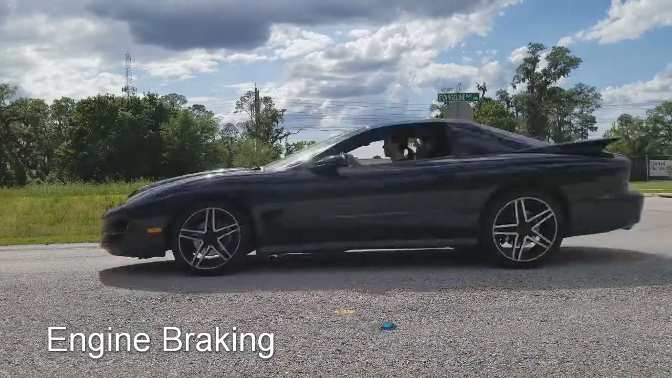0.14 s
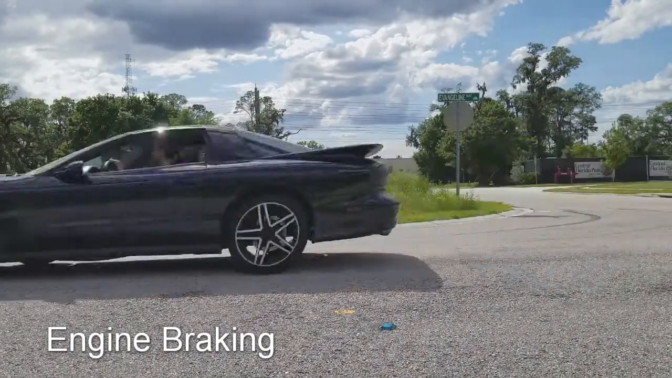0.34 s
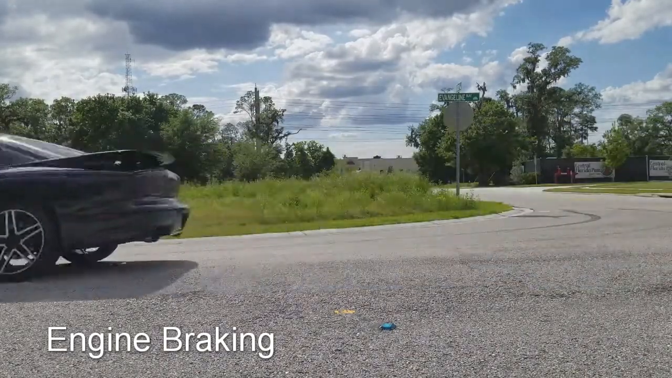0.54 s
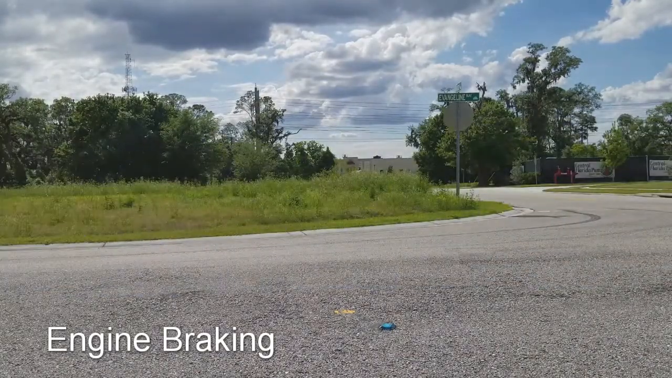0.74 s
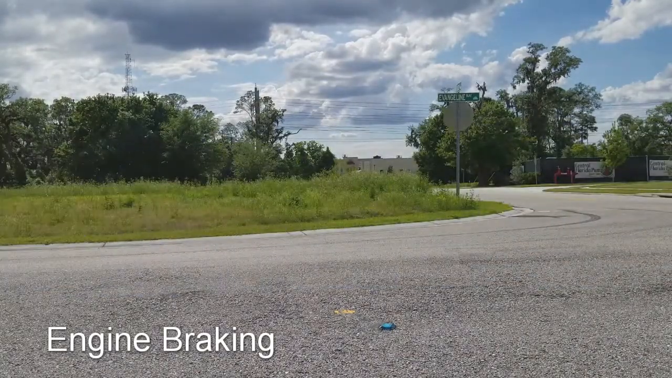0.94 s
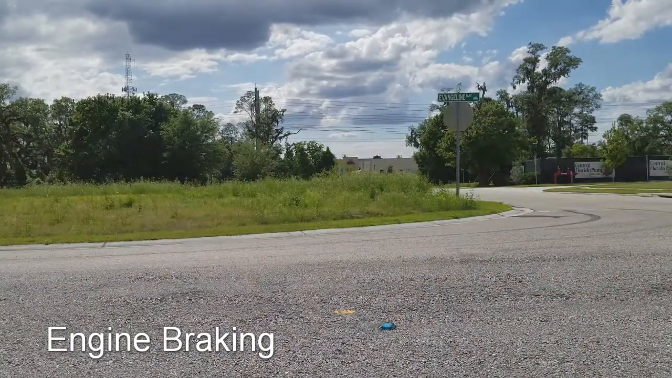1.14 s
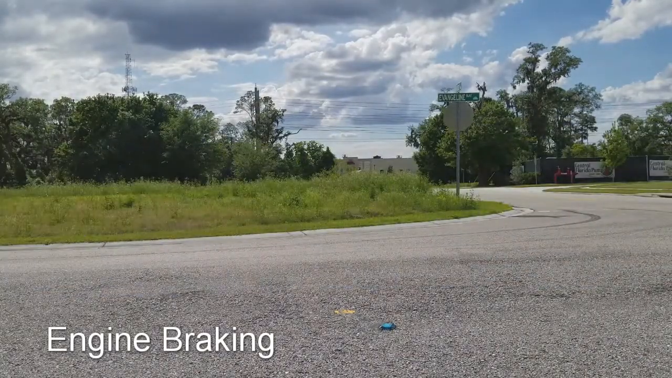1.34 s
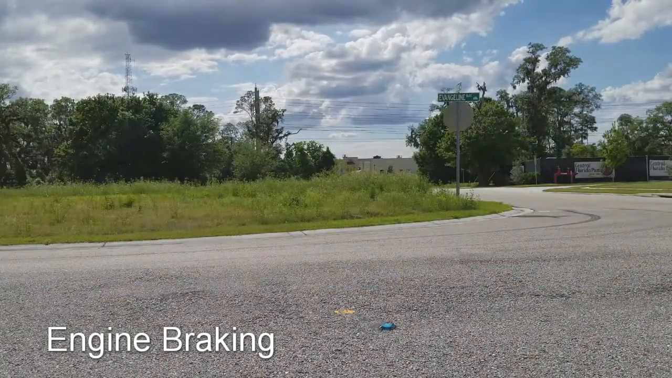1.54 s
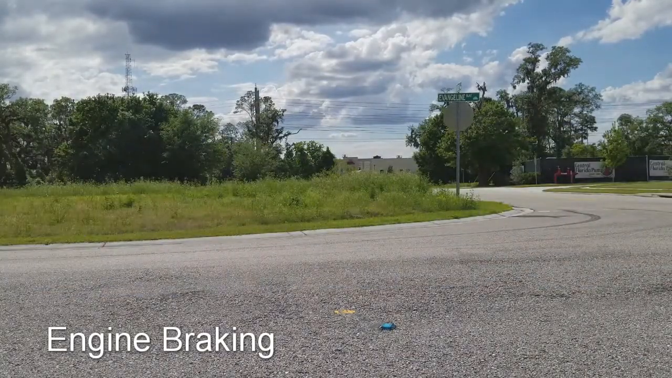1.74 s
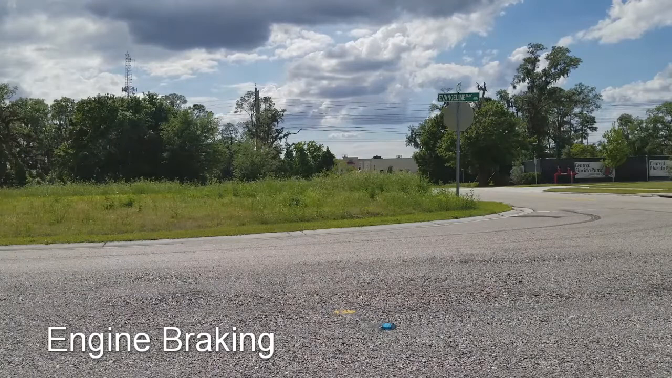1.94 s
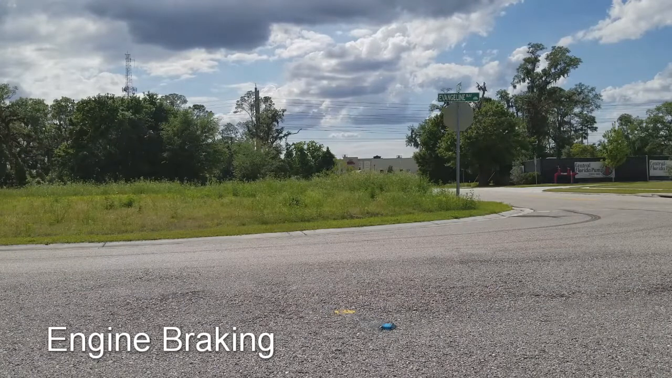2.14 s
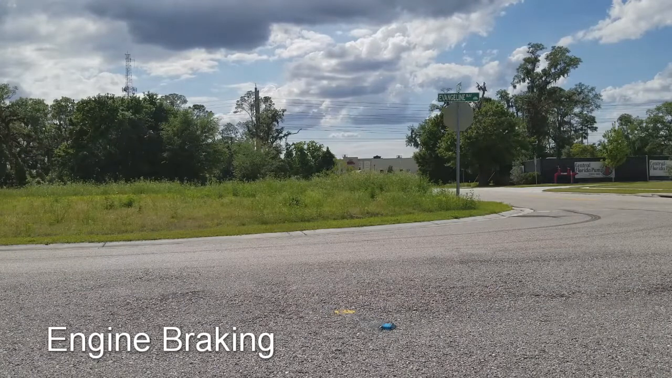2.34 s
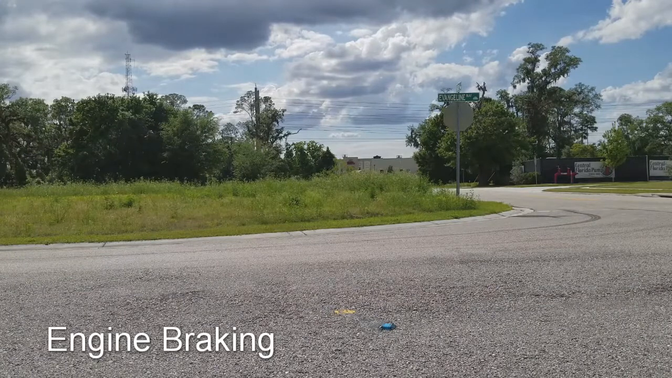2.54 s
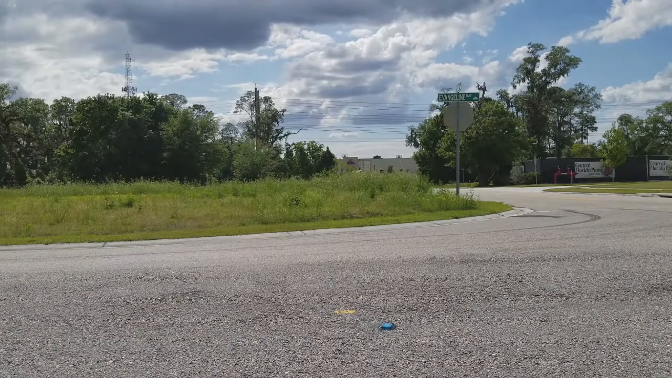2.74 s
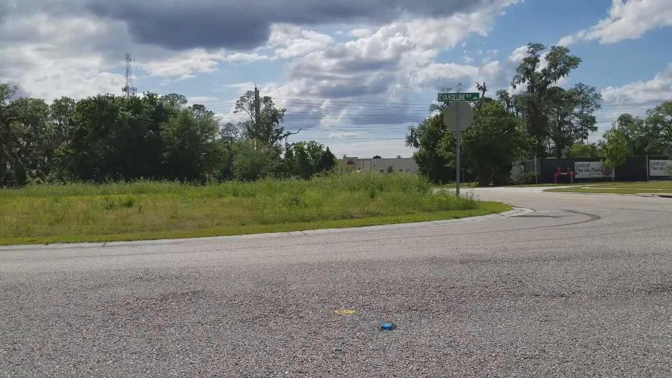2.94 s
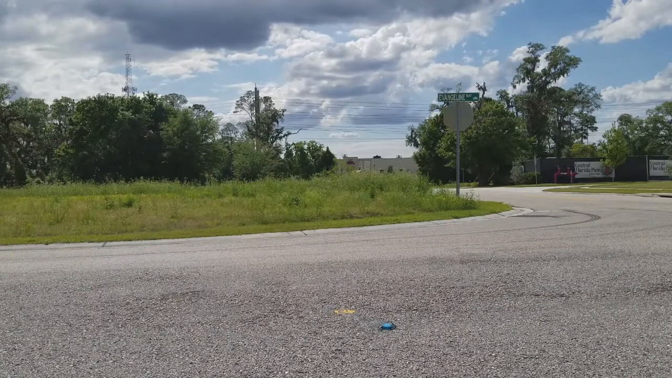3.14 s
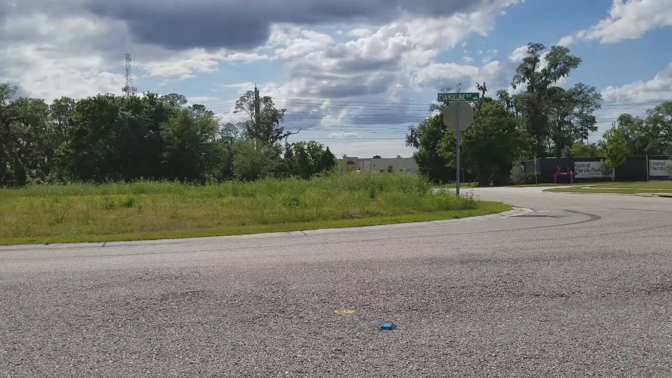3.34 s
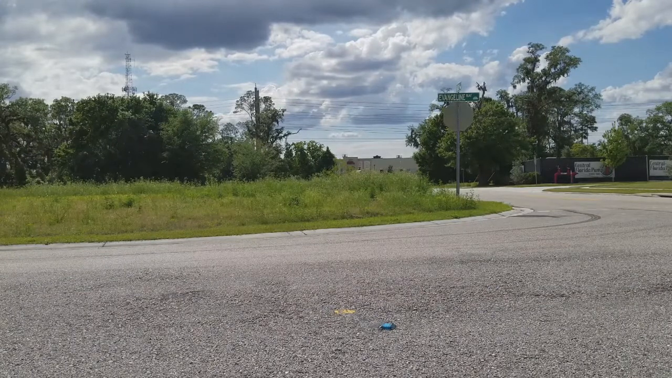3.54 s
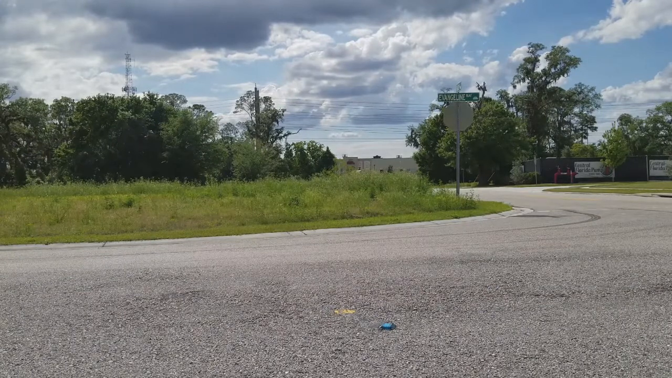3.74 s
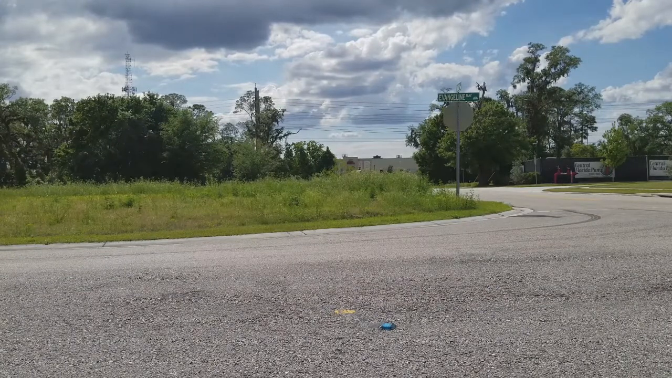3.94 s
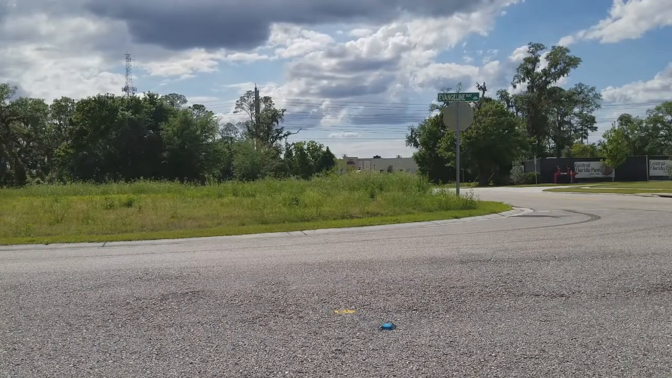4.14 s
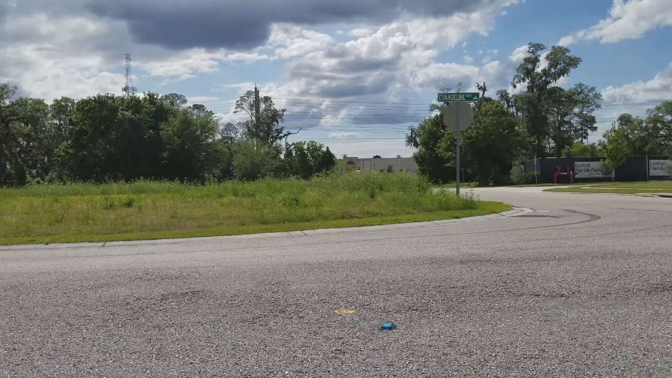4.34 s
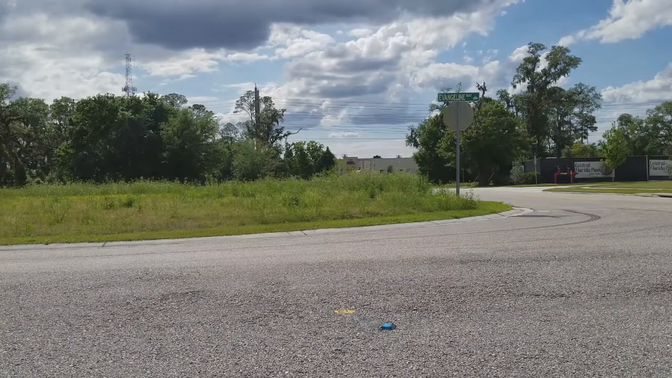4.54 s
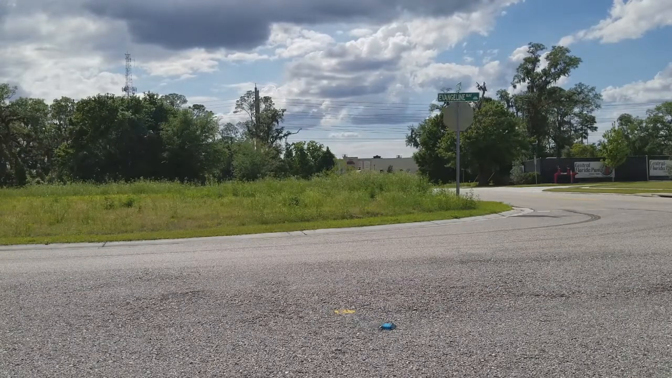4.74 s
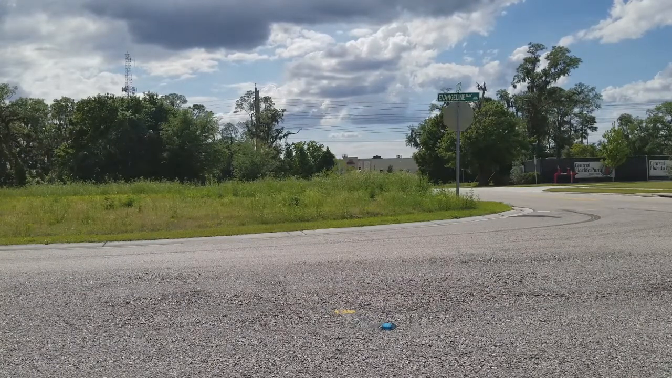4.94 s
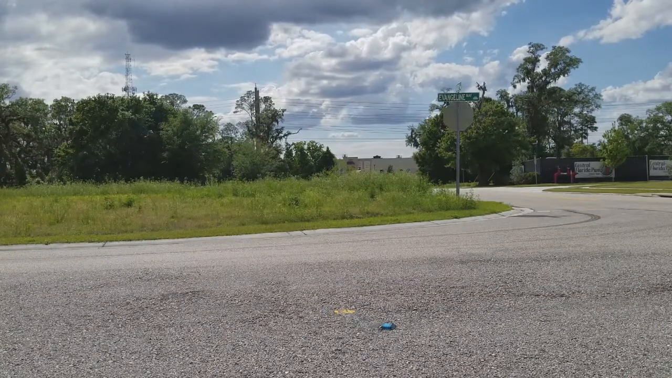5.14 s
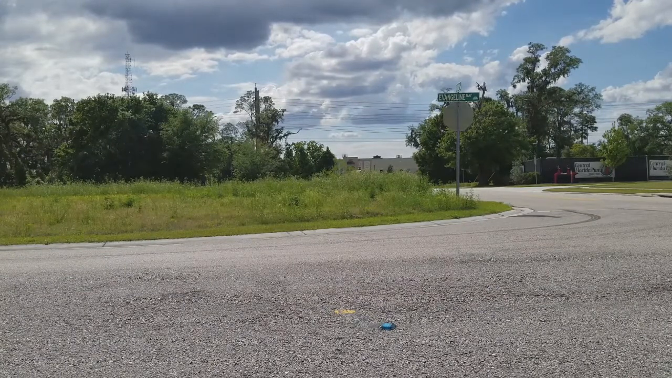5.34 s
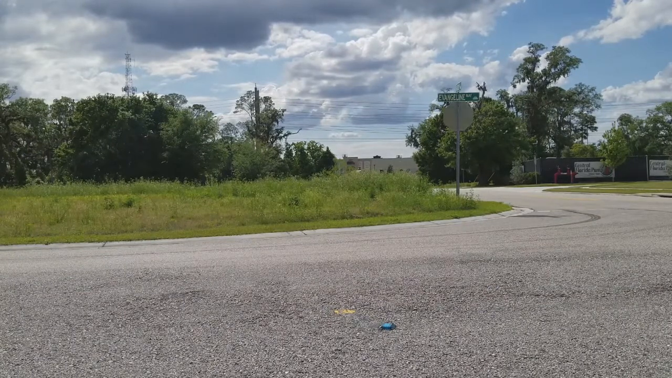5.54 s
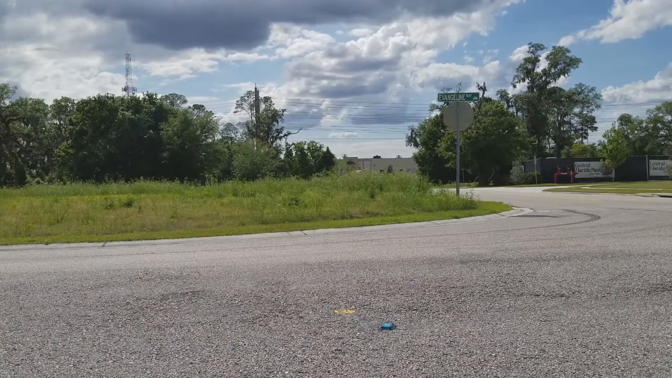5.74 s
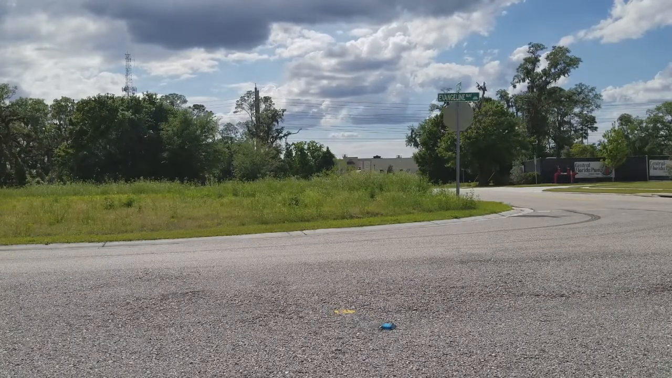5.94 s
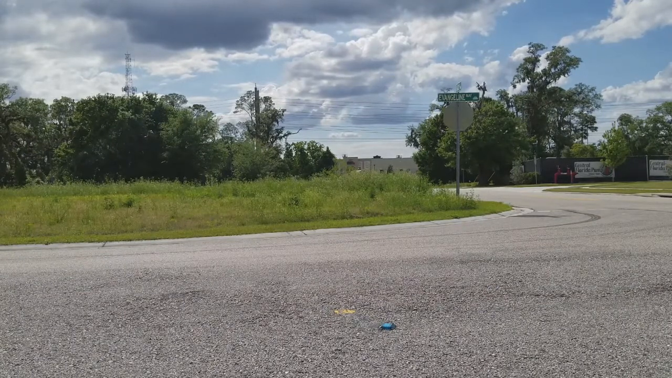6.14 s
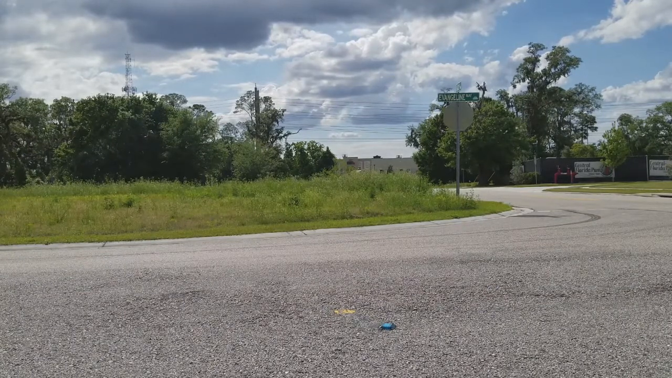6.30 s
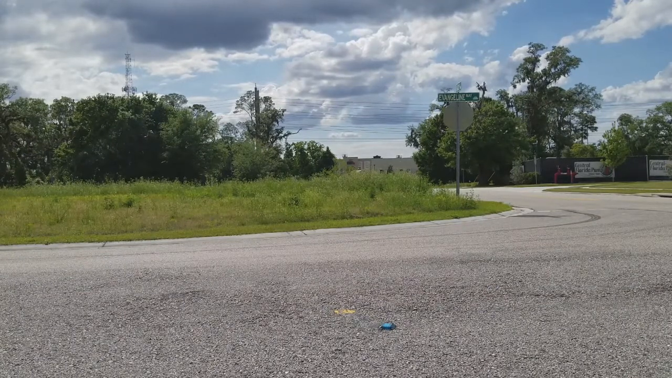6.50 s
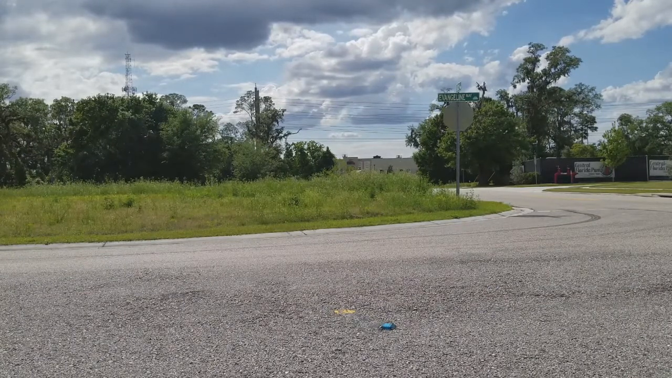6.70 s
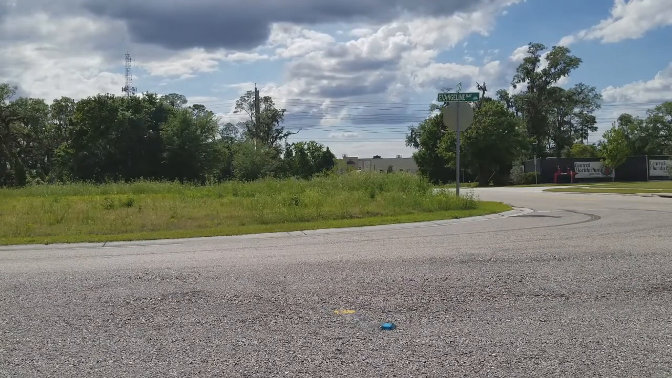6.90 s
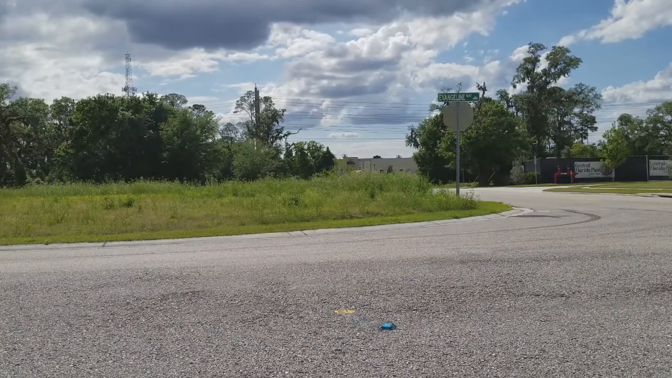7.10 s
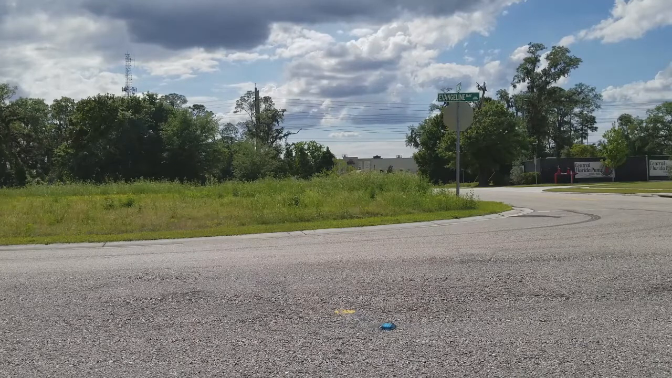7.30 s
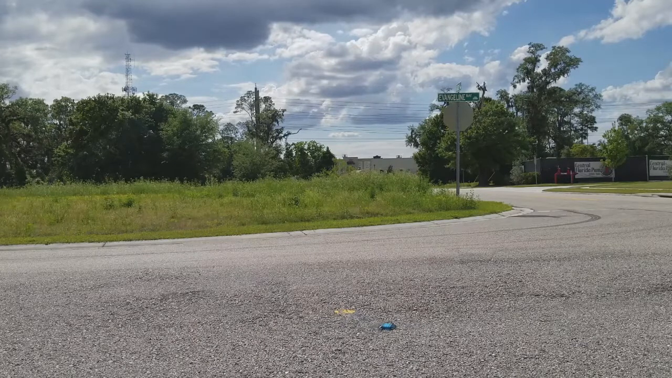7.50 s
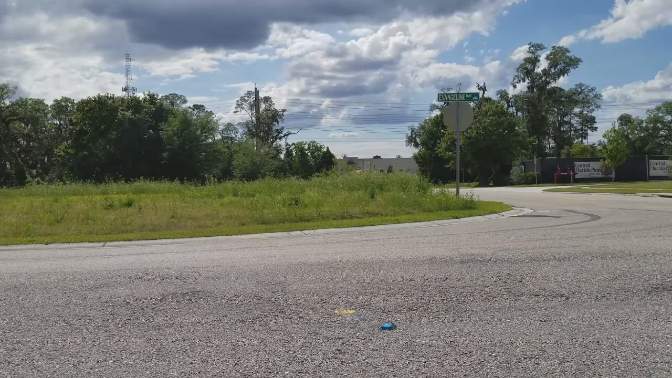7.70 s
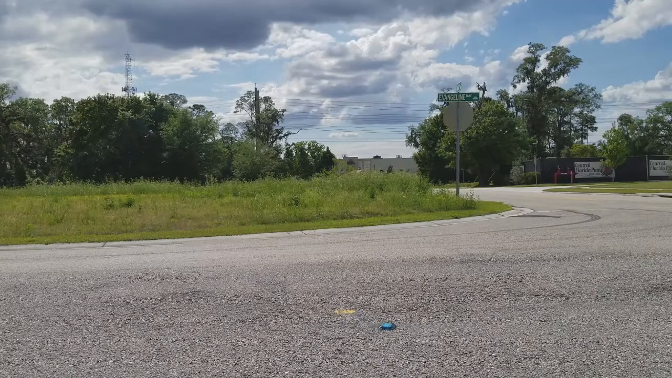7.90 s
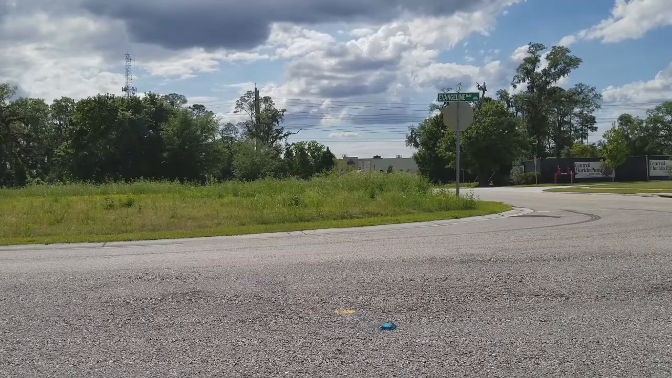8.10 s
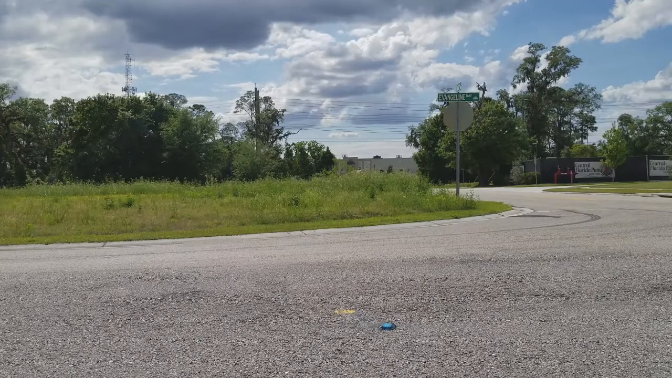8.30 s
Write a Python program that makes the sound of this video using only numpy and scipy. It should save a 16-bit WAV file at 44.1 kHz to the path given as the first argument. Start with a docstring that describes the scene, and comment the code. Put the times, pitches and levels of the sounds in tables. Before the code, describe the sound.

Outdoors beside a road, in stereo. At 0 s a V8 car is already close, coasting by with a loud, deep, lumpy exhaust burble over the bright grainy hiss of tyres on coarse asphalt. It is loudest around 0.5 to 1 s, throbbing gently, then moves off to the left, tyres fading and the note sinking until about 2.2 s. There a quick cluster of dull exhaust pops rings the pipe. Around 2.7 s it takes up load with a slight stumble; the pitch climbs steadily with growing rasp and a faint breathy whistle. From 5.2 s it pulls harder, briefly flat out around 6 to 6.7 s with a rough, unsteady rasp, now more distant. From 6.8 s it lifts off and the buzzing drone slides down until the end at 8.4 s. Light breeze, microphone hiss and faint dull tree echoes surround it; one very short bird note sounds near 8 s.

```python
"""A V8 car rolls close past, its exhaust burbling over the hiss of its tyres, and pops as it draws away.
It then pulls, is flat out for a moment with a hard rasp, lifts off and slows on the engine.
The exhaust adds tones locked to the engine's turning to gas noise and ringing tailpipes; pops ring the pipe.
Tyres, a light breeze and microphone hiss are coloured noise; a bird gives one short note near the end.
Two spaced microphones hear the car with slight differences, along with dull echoes from trees."""
import sys
import numpy as np
from scipy import signal
from scipy.fft import rfft, irfft, next_fast_len
from scipy.io import wavfile
from scipy.ndimage import uniform_filter1d, map_coordinates

SR = 44100
rng = np.random.default_rng(int(sys.argv[2]) if len(sys.argv) > 2 else 0)


def dump_mix(stems):
    """Bounce the given channels to the path in sys.argv[1] as a 16-bit WAV at rate SR."""
    frames = np.atleast_2d(stems).T  # one column per channel
    limited = np.clip(frames, -1, 1)  # hard clip at full scale
    pcm = np.round(limited * 32767).astype(np.int16)
    wavfile.write(sys.argv[1], SR, pcm)


N = 368676
TIME = np.arange(N) / SR   # seconds

# The eight stages, in order: coasting alongside, just past, coasting away, taking up the load,
# pulling, flat out, braking from high revs, slowing.
# A "cycle" is two turns of the engine, in which all eight cylinders fire once.
# An "order" is a tone at a whole multiple of the cycle rate.

# each change to the next stage: (start [s], length of the change [s])
CHANGES = [(.5, 0.24), (1.001, 0.68), (2.2, 0.35), (3.5, 1.14), (5.15, .16), (5.92, 0.24), (6.8, 0.88)]

# engine speed before its swings and jitter: (time [s], speed [rpm])
REVS = [(0.0, 2288.3), (0.55, 2119.6), (1.36, 1956.6), (2.23, 1811.2), (2.52, 1792.4), (2.7, 1830),
        (2.92, 1831), (3.49, 1943), (4.06, 2082), (5.15, 2462.5), (5.26, 2561.5), (5.87, 2938),
        (6.23, 2845), (6.35, 2925), (6.48, 2885), (6.63, 2882), (6.83, 2805), (7.08, 2695), (7.49, 2536.3),
        (8.36, 2156.5)]
# swings of the revs after each throttle step rocks the driveline:
# (time [s], swing [share of the revs], decay [s])
SHUFFLES = [(2.685, .019, .6), (5.215, .02, .3), (5.95, -.007, .25)]
SHUFFLE_HZ = 3.42
# unsteadiness of the crank, greatest flat out; one value per stage: [share of the revs]
CRANK_JITTER = (.001, .001, .001, .0015, .0006, .003, .0024, .001)

# strength of each cylinder's blow, in firing order; one column per stage: (level [dB], ...)
CYLINDERS = [(3, 10, 5, -4, -4, -4, 4, 4), (0, 1, 2, 6, 6, 5, -5, -5), (-4, -5, -3, 0, 0, -1, -5, -5),
             (4, 5, 4, 7, 7, 8, 10, 10), (0, -3, -1, 3, 3, 5, 4, 4), (2, -3, 2, 5, 5, 2, -5, -5),
             (3, 1, 2, 6, 6, 7, 7, 7), (-3, -4, -2, 1, 1, -3, -1, -1)]
# which bank of the V each cylinder sits in, in firing order: [0, or 1 for the longer way out]
BANK = (0, 1, 0, 1, 1, 0, 1, 0)
BANK_LAG = 0.2228   # delay of the longer way, as a share of the firing interval

# base level of the exhaust tones as load and distance change: (time [s], drone [dB], burble [dB])
LOUDNESS = [(0, -34.5, -43.5), (.45, -32.5, -40), (1, -32, -42.5), (1.6, -39.5, -55), (2.2, -42.5, -59.5),
            (2.45, -44, -55.5), (2.72, -40.5, -51.5), (2.95, -38, -46), (3.6, -34, -46), (4.2, -36.5, -50),
            (4.65, -31.5, -46), (5.2, -40.5, -47.5), (5.95, -52.5, -51.5), (6.3, -49, -48),
            (7.25, -45, -49.5), (8.36, -48, -54.5)]
# the drone, made of the main orders: [multiple of the cycle rate]
DRONE_ORDERS = (3, 6, 8, 12, 16)
# one row per drone order, one column per stage: (level above the drone's base [dB], ...)
DRONE = [(13.5, 12, 14.5, -5.5, 1.5, 18.5, -7, 13.5), (8, 8, 3.5, -1.5, -7.5, -2, 12.5, 13.5),
         (-5.5, -3, 6.5, 3, 7, 14, 10, 4.5), (8.5, 7, 5.5, -4, -18, -5, 7.5, 5.5),
         (-12.5, -21.5, 0.5, 0, 3, 4.5, -9, -4.0)]
# the burble, made of orders that uneven firing brings out: [multiple of the cycle rate]
BURBLE_ORDERS = (4, 5, 7, 9, 10, 11, 13, 14, 15, 17, 18, 20, 21, 22, 23, 24, 25, 26, 28, 29, 32, 33, 35, 37)
# one row per burble order, one column per stage: (level above the burble's base [dB], ...)
BURBLE = [(18, 15.5, 25.5, 11, -6.5, -4.5, -14, -10), (-3.5, -5.5, 16, -7, 0, 8.5, 2, -7),
          (-15, -19.5, 8, -3, -15, -7, -21, -9), (-13.5, -4, 7.5, 0.5, -3.5, -14, -3, 1),
          (-3, -11.5, 14.5, -1, 3, -17, 4.5, -9), (18.5, 13.5, 8, 4.5, -3.5, -2, -0.5, -6),
          (6.5, 3, -6, -0.5, 8, 6, 3, 6.5), (13, 11.0, 16.5, 0.5, -2, -4, 12.5, 7),
          (-20.5, -10, 14.5, -10.5, 3.5, 10, -3.0, 5), (14.5, 4, -13, 0, -5.5, -2.5, -16, -2),
          (-1.5, -4.5, -7.5, 6.5, 3.5, 0, -1.5, 3.5), (-0.5, 6.0, -15, 5.5, 4.5, 1.5, 8.5, -11.5),
          (-9, 7, 12.5, -9, 9, -0.5, -3, 1.5), (8, 9, 16, -4.0, -5, -2.0, 4, -0.5),
          (5.5, 4, 5, 1, -2.5, -5.5, -13.0, -4), (8.5, 7, 8, 5.5, 3.0, -6, 1, -2),
          (-3.5, 5.5, 5, 1.5, -19, -16, -14, 3), (1, 2.5, 15.5, -1, 1, -7, -3, -7),
          (-1.5, -2.5, -22, -1.5, -7.5, 6, -3.5, 6), (4.5, -2.5, -7, 0.5, -5, 0, -5, 0),
          (0, -9, 6.5, 1.5, -7.5, -5.5, -1, -5.5), (-8.5, 1, 4, -14, 4.5, 1.0, -1, -14),
          (-8.5, 0.5, 18, -6.5, -11, -2, -14.5, -11.5), (-7, -22, 14, -12.5, 5, -7, -15, 8)]
# all other orders lie on one slope; one row per stage: (level at the pivot [dB], slope [dB per octave])
WEAK_ORDERS = [(-9, 2), (-11, 6.5), (4.5, 0), (-7, -0.5), (-9.5, 10.5), (-9, 12), (-13, 13), (-13.5, 17)]
BURBLE_WAVER_DB = 1.0

# broad colour of the exhaust pipes: (frequency [Hz], level [dB])
PIPE = [(60, -9), (130, 2), (200, 1.5), (250, 9.5), (300, 6.5), (350, 8), (450, 11.5), (530, -9), (620, 1),
        (720, -5), (900, -29.5)]
# standing waves that boom or cancel as an order slides through: (frequency [Hz], width [Hz], level [dB])
BOOMS = [(51.2, 18.5, 17), (89, 16.2, 25), (145.7, 51.8, 14.5), (262.2, 44.5, 8.5), (354.7, 30, 4.5),
         (405, 51, -5), (499.2, 20, 12), (596, 26, 11.5), (661, 45, 8), (826, 45, 17.5)]
# the mufflers spread each blow, lower orders coming out later; one value per stage: [ms per octave]
SMEAR_MS_PER_OCTAVE = (4.4, 2.07, 3.2, 5.2, 4.4, 4, 4.54, 4.9)

# base strength of the jets at the tailpipes: (time [s], level [dB])
JET = [(0, -39.5), (.6, -32.5), (1.15, -48.5), (1.7, -39), (2.2, -41), (2.42, -62.5), (3.3, -49.5),
       (4.14, -46), (4.44, -38.5), (5.2, -42), (5.29, -35.5), (5.9, -36.5), (6.1, -56), (6.26, -43),
       (6.73, -48), (7.33, -38), (7.55, -45.5), (8.36, -46)]
# gas noise, one row per stage: (rasp above the jet [dB], hiss above the jet [dB], mean turbulence [dB])
GAS = [(-5, -26.5, -37), (6.5, -22, -33), (-0.5, -20.5, -31), (5, -5.5, -33), (8.5, -11, -29.5),
       (8.5, -5.5, -24), (6.5, -13.5, -30), (4.5, -17.5, -30.5)]
TURBULENCE_FOLLOWS = 0.42   # share of the burble's swing in dB that the turbulence follows
# colours of the gas noise: (frequency [Hz], level [dB])
TURBULENCE = [(70, -21.5), (160, -6), (210, -13), (260, -5), (310, -4), (380, -14), (450, -7), (530, -13),
              (660, -10), (800, -9), (1000, -10), (1300, -24)]
RASP = [(600, -32.5), (900, -25.5), (1100, -5.5), (1350, 7), (1600, 3.5), (1900, -23), (3000, -52)]
HISS = [(1800, -4), (2600, -16.5), (3100, 9.5), (3700, -4.5), (4500, -3.5), (5600, -9.5), (6800, -22.5),
        (7600, -21), (8800, -24), (15000, -26)]

# strong blows steepen most on their way down the pipe; one value per stage: [dB of bark per dB of blow]
STEEPENING = (.7, .45, 1.1, 1.5, 1.7, 1.3, 1.4, 1.4)
# tailpipe tips, rung by each pressure front: (frequency [Hz], level [dB], time to fall 60 dB [s])
TIP_MODES = [(850, -6, .014), (1100, -15, .012), (1365, 3.5, .02), (1490, 1, .016), (1590, 0, .016),
             (1740, -4, .012)]
# tilt of the bark's colour; one value per stage: [dB per octave]
BARK_TILT = (-10, -12, 9, -5, -1, 6, -6, -5)
BARK_SCATTER_DB, BARK_SHARE = 2.0, .9   # chance between blows; part of the rasp that is bark

# faint whistle of the gas under a light throttle: (time [s], pitch [Hz], level [dB])
WHISTLE = [(2.5, 3950, -82), (3, 4000, -71), (3.55, 4330, -63.5), (4.3, 4350, -58.5), (4.7, 4000, -63),
           (6.6, 4000, -74), (7.3, 3950, -66)]

# afterfire: (time [s], strength [dB])
POPS = [(2.2296, -17), (2.2636, -15), (2.293, -22.5), (2.297, -17.5), (2.3082, -20), (2.3216, -24),
        (2.34, -34)]
# what the pipe rings with after a pop: (frequency [Hz], level [dB], time to fall 60 dB [s])
POP_MODES = [(55, -6, 0.1), (140, -3, 0.19), (254, 4.5, 0.19), (382, 2, 0.093), (462.5, 1.5, 0.13),
             (644, 10, 0.035), (754, 1.5, 0.026), (1490, -21, 0.033)]
POP_ECHO_S, POP_ECHO_SHARE = 0.00714, 0.3   # the pop comes back down the pipe
MISFIRE_S = 2.775

# tyres on coarse asphalt, fading with distance, before a fixed gain: (time [s], level [dB])
ROLLING = [(0, -19.5), (.2, -27.5), (.55, -30), (1, -35.5), (1.5, -40), (2.1, -45), (3, -63), (8.36, -68.5)]
# the brightest tyre band sweeps as the car goes by: (time [s], centre [Hz], level [dB])
SWISH = [(0, 930, -39.5), (.08, 1146, -29.5), (.16, 1400, -33.5), (.42, 1101, -35), (.65, 1242, -34.5),
         (1.1, 1173, -53.5), (1.5, 1150, -80)]
# colours of the tyres, breeze and microphone hiss: (frequency [Hz], level [dB])
TYRES = [(300, 16), (900, -1), (1550, -11), (2000, -22), (3000, -20.5), (4500, -28.5), (6000, -34.5),
         (7500, -29.5), (9000, -40), (12000, -33.5), (15500, -34.5)]
BREEZE = [(15, -21.5), (35, -3), (85, 2.5), (200, -3.5), (500, -36.5)]
MIC_HISS = [(1000, 21.5), (5000, -19.5), (8400, -34.5), (9400, -8), (10050, -3), (10700, -7.5),
            (11500, -35.5), (15500, -18)]

# bearing of the car: (time [s], lead of the left microphone [ms])
BEARING = [(0, -.08), (.4, 0), (.55, .13), (.7, .32), (1.2, .42), (2.2, .485), (3.2, .51), (8.36, .52)]
# a far bird's single note: (time [s], pitch [Hz], peak [dB], length [s])
CHIRP = (7.958, 2620, -50, .012)
CUTOFF_HZ = 15750


def from_db(db):
    """Turn decibels into a plain multiplier."""
    return 10 ** (np.asarray(db) / 20)


def rms_one(x):
    """Scale a signal to an rms (average strength) of 1."""
    return x / np.sqrt(np.mean(x ** 2) + 1e-20)


def in_time(rows):
    """Draw each column of a table as a curve with one value per sample."""
    s, *columns = np.transpose(rows)
    return [np.interp(TIME, s, column) for column in columns]


def at_hz(points, hz):
    """Read a spectrum in dB on a log-frequency axis."""
    f, db = np.transpose(points)
    return np.interp(np.log(hz + 1e-3), np.log(f), db)


def noise(spectrum):
    """Coloured noise of rms 1, falling steeply beyond the ends of its spectrum."""
    size = next_fast_len(N)
    hz = np.arange(size // 2 + 1) * SR / size + 1e-3
    lowest, highest = spectrum[0][0], spectrum[-1][0]
    ends = (1 + (lowest / hz) ** 4) * (1 + (hz / highest) ** 4)
    gain = from_db(at_hz(spectrum, hz)) / np.sqrt(ends)
    white = rfft(rng.standard_normal(size))
    return rms_one(irfft(white * gain, size)[:N])


def drift(rate_hz):
    """Slow random wandering of rms 1, made at a fortieth of the sample rate and drawn out."""
    step = 40
    r = np.exp(-2 * np.pi * rate_hz * step / SR)
    white = rng.standard_normal(N // step + 2002)
    slow = signal.lfilter([1], [1, -2 * r, r * r], white)[2000:]   # skip the filter's start
    return np.interp(np.arange(N) / step, np.arange(len(slow)), rms_one(slow))


def ring(clicks, hz, t60):
    """A resonance: each unit click starts a dying sine of height about 1."""
    r, w = from_db(-60 / (t60 * SR)), 2 * np.pi * hz / SR
    # the tiny offset keeps the filter's numbers from becoming too small to handle quickly
    return signal.lfilter([0, np.sin(w)], [1, -2 * r * np.cos(w), r * r], clicks + 1e-18)


def decaying(clicks, decay_s):
    """Each click jumps up and dies away exponentially."""
    return signal.lfilter([1], [1, -np.exp(-1 / (decay_s * SR))], clicks)


def narrow_noise(hz, width_hz):
    """Noise in a narrow band around a moving pitch, rms about 1."""
    phase = 2 * np.pi * np.cumsum(hz) / SR
    return drift(width_hz) * np.cos(phase) + drift(width_hz) * np.sin(phase)


def engine_state():
    """The share of each of the eight stages, fading from one into the next; shape 8 x N."""
    begun = [np.clip((TIME - s) / length_s, 0, 1) for s, length_s in CHANGES]
    return -np.diff([np.ones(N), *begun, np.zeros(N)], axis=0)


def firing_slots():
    """When each cylinder's blow leaves the pipe, in cycles: one bank has a longer way out."""
    return (np.arange(len(BANK)) + BANK_LAG * np.array(BANK)) / len(BANK)


def exhaust_note(cycle, cycle_hz, state, drone_waver_db=0.77, tilt_db=4.5, pivot_hz=350, count=60):
    """Drone and burble: orders timed by the uneven firing, coloured and delayed by the pipe's resonances."""
    grid = np.arange(2048.)   # Hz
    boom_db = sum(db / (1 + (2 * (grid - hz) / width) ** 2) for hz, width, db in BOOMS)
    pipe_db = at_hz(PIPE, grid) + boom_db
    pipe_log = np.log(from_db(pipe_db))
    # a resonator that cannot answer before it is struck has its phase set by its loudness curve
    pipe_turn = -signal.hilbert(np.r_[pipe_log, pipe_log[::-1]]).imag[:len(grid)]
    blows = from_db(CYLINDERS)
    smear_s = np.array(SMEAR_MS_PER_OCTAVE) @ state / 1000
    drone_db, burble_db = in_time(LOUDNESS)
    weak_db, weak_slope_db = np.transpose(WEAK_ORDERS) @ state
    out = 0
    for k in range(DRONE_ORDERS[0], count):
        hz = k * cycle_hz
        octaves = np.log2(hz / pivot_hz)
        if k in DRONE_ORDERS:
            own_db = DRONE[DRONE_ORDERS.index(k)] @ state
            db = drone_db + own_db + drone_waver_db * drift(7.4)
        else:
            if k in BURBLE_ORDERS:
                own_db = BURBLE[BURBLE_ORDERS.index(k)] @ state
            else:
                own_db = weak_db + weak_slope_db * octaves
            db = burble_db + own_db + BURBLE_WAVER_DB * drift(5.6)
        # the strongest blows set the timing
        firing = np.angle(np.exp(-2j * np.pi * k * firing_slots()) @ blows)
        smear = 2 * np.pi * smear_s * (hz * octaves - (hz - pivot_hz) / np.log(2))
        phase = 2 * np.pi * k * cycle + np.unwrap(firing) @ state + np.interp(hz, grid, pipe_turn) + smear
        level = from_db(db + np.interp(hz, grid, pipe_db) + tilt_db * octaves)
        out = out + level * np.sqrt(2) * np.cos(phase)
    return out


def puffs(cycle, state, decay=1.0, rise=0.88, scatter_db=1.0, steady=0.45):
    """Gas flow at the tailpipes: a swell for each firing, no two alike; rms 1."""
    count = len(BANK)
    chance = rng.standard_normal((int(cycle[-1]) + 3, count))
    flow = steady
    for j, slot in enumerate(firing_slots()):
        turn, age = np.divmod(cycle - slot + 1, 1)
        intervals = age * count   # age counted in firing intervals, as are decay and rise
        blow_db = np.array(CYLINDERS[j]) @ state + scatter_db * chance[turn.astype(int), j]
        swell = np.exp(-intervals / decay) - np.exp(-intervals / rise)
        flow = flow + from_db(blow_db) * swell * 2
    return rms_one(flow)


def fronts(cycle, state):
    """One click for the steep front of each blow, in the cylinders' pattern; local level evened to rms 1."""
    clicks = np.zeros(N)
    for slot, blow_db in zip(firing_slots(), np.array(CYLINDERS) * STEEPENING):
        at = np.flatnonzero(np.diff(np.floor(cycle - slot)))
        scatter_db = BARK_SCATTER_DB * rng.standard_normal(len(at))
        clicks[at] = from_db(blow_db @ state[:, at] + scatter_db)
    power = np.abs(uniform_filter1d(clicks ** 2, size=SR // 4))   # over a quarter of a second
    return clicks / np.sqrt(power + 1e-9)


def bark(clicks, state, pivot_hz=1400, scatter_db=2.5):
    """Pressure fronts ring the tailpipe tips, each a little differently, tilted by stage; rms 1."""
    tilt_db = np.array(BARK_TILT) @ state
    rings = 0
    for k, (hz, db, t60) in enumerate(TIP_MODES):
        chance_db = scatter_db * np.clip(rng.standard_normal(N), -2, 2)
        strength = from_db(db + tilt_db * np.log2(hz / pivot_hz) + chance_db)
        rings = rings + (-1) ** k * ring(clicks * strength, hz, t60)
    band = signal.butter(3, [700, 1950], "band", fs=SR, output="sos")
    return rms_one(signal.sosfilt(band, rings))


def exhaust_gas(flow, clicks, state, turbulence_pulsing=0.3, hiss_pulsing=0.3, spit_s=0.0022):
    """Each puff churns in the pipe, barks and rasps at its mouth and spits hiss beyond it."""
    rasp_db, hiss_db, turbulence_db = np.transpose(GAS) @ state
    jet_db, burble_db = in_time(JET)[0], in_time(LOUDNESS)[1]
    churn_db = turbulence_db + TURBULENCE_FOLLOWS * (burble_db - burble_db.mean())
    churn = from_db(churn_db) * noise(TURBULENCE) * rms_one(1 + turbulence_pulsing * (flow - 1))
    breath = np.sqrt(1 - BARK_SHARE ** 2) * noise(RASP) * flow
    rasp = from_db(jet_db + rasp_db) * (BARK_SHARE * bark(clicks, state) + breath)
    spit = rms_one(decaying(clicks, spit_s))
    hiss = from_db(jet_db + hiss_db) * noise(HISS) * rms_one(1 + hiss_pulsing * (spit - 1))
    return churn + rasp + hiss


def tyre_level(gain_db=5.5):
    """Loudness of the rolling tyres, fading with distance."""
    return from_db(in_time(ROLLING)[0] + gain_db)


def tyre_swish(width_hz=110):
    """The brightest tyre band at close range: narrow noise on a sweeping centre."""
    hz, db = in_time(SWISH)
    return from_db(db) * narrow_noise(hz, width_hz)


def roadside(car, shade=0.39, shade_hz=800, echo_cut_hz=4500, count=14):
    """The right microphone hears the car shifted in time and shaded; trees scatter faint dull echoes."""
    lead_s = in_time(BEARING)[0] / 1000   # below zero at first, when the right one leads
    late = map_coordinates(car, [(TIME - lead_s) * SR], order=3, mode="nearest")
    shade_band = signal.butter(1, [shade_hz / 2, shade_hz * 2], "band", fs=SR, output="sos")
    middle = signal.sosfilt(shade_band, late)
    direct = np.array([car, late - shade * lead_s / lead_s.max() * middle])
    echo_band = signal.butter(2, [450, echo_cut_hz], "band", fs=SR, output="sos")
    scattered = signal.sosfilt(echo_band, car)
    lags = (rng.uniform(.02, .22, (2, count)) * SR).astype(int)
    echoes = np.array([sum(np.pad(scattered, (lag, 0))[:N] for lag in row) for row in lags])
    return direct + from_db(-17) * echoes / np.sqrt(count)


def breeze(level_db=-38.0, apart=0.36):
    """A light wavering breeze: low noise shared by both microphones, plus a part of each one's own."""
    own = np.array([noise(BREEZE), noise(BREEZE)])
    return from_db(level_db + 2 * drift(2.7)) * (noise(BREEZE) + apart * own)


def mic_hiss(level_db=-44.5):
    """Each microphone's own steady coloured noise."""
    return from_db(level_db) * np.array([noise(MIC_HISS), noise(MIC_HISS)])


def lope(cycle, just_past, depth=.07, peak_at=.09):
    """Just past the listener, the engine's level throbs gently once a cycle."""
    return 1 + depth * just_past * np.cos(2 * np.pi * (cycle - peak_at))


def afterfire(level_db=-1.0, crack_db=-9.0, crack_s=0.004, roar_db=-11.0, roar_s=.011, soft_hz=1900):
    """Unburnt fuel goes off deep in the pipe: a crack and its return, a short roar, and the pipe rings."""
    clicks, out = np.zeros(N), 0
    for s, db in POPS:
        clicks[round(s * SR)] += from_db(db)
        clicks[round((s + POP_ECHO_S) * SR)] += POP_ECHO_SHARE * from_db(db)
    for k, (hz, mode_db, t60) in enumerate(POP_MODES):
        out = out + (-1) ** k * from_db(mode_db) * ring(clicks, hz, t60)
    crack = (noise(RASP) + 0.31 * noise(HISS)) * decaying(clicks + 1e-18, crack_s)
    roar = noise(TURBULENCE) * decaying(clicks + 1e-18, roar_s)
    out = out + from_db(crack_db) * crack + from_db(roar_db) * roar
    soften = signal.butter(2, soft_hz, fs=SR, output="sos")
    return from_db(level_db) * signal.sosfilt(soften, out)


def gas_whistle(width_hz=130, lower_hz=3200, lower_db=0.5):
    """Two breathy whistles that swell together: one moves in pitch, the lower one keeps its pitch."""
    hz, db = in_time(WHISTLE)
    lower = from_db(lower_db) * narrow_noise(np.full(N, lower_hz), width_hz)
    return from_db(db) * (narrow_noise(hz, width_hz) + lower)


def shuffle():
    """The dying swings of the revs after each throttle step, as a share of the revs."""
    out = 0
    for s, swing, decay_s in SHUFFLES:
        age = np.maximum(TIME - s, 0)
        out = out + swing * np.exp(-age / decay_s) * np.sin(2 * np.pi * SHUFFLE_HZ * age)
    return out


def misfire(depth=0.5, length_s=0.0074):
    """The engine stumbles once as it takes up the load: a brief dip to half its height."""
    return 1 - depth * np.exp(-((TIME - MISFIRE_S) / length_s) ** 2)


def bird():
    """One short, nearly pure note: a sine that swells and fades smoothly."""
    s, hz, db, length_s = CHIRP
    return from_db(db) * np.exp(-((TIME - s) / length_s) ** 2) * np.sin(2 * np.pi * hz * TIME)


def scene():
    """The car with its tyres, a bird, the breeze and the microphones' own hiss."""
    cycle_hz = in_time(REVS)[0] / 120   # rpm to cycles per second, two turns each
    state = engine_state()
    jitter = np.array(CRANK_JITTER) @ state * drift(11.9)
    cycle = np.cumsum(cycle_hz * (1 + shuffle() + jitter)) / SR
    gas = exhaust_gas(puffs(cycle, state), fronts(cycle, state), state)
    engine = exhaust_note(cycle, cycle_hz, state) + gas
    exhaust = engine * lope(cycle, state[1]) * misfire() + gas_whistle() + afterfire()
    # four tyres make a wide source: most of their hiss differs between the microphones
    rolling = tyre_level()
    wide_tyres = rolling * np.array([noise(TYRES), noise(TYRES)])
    car = roadside(exhaust + tyre_swish() + .5 * rolling * noise(TYRES)) + wide_tyres
    return car + bird() + breeze() + mic_hiss()


def record(dry, fade_s=.002):
    """Fade in quickly, round off the highest peaks at full scale and cut the top treble."""
    rounded = dry / (1 + dry ** 8) ** (1 / 8)
    held = np.minimum(TIME / fade_s, 1) * rounded
    return signal.sosfilt(signal.ellip(10, .1, 90, CUTOFF_HZ, fs=SR, output="sos"), held)


dry = scene()
out = record(dry)
dump_mix(out)
```